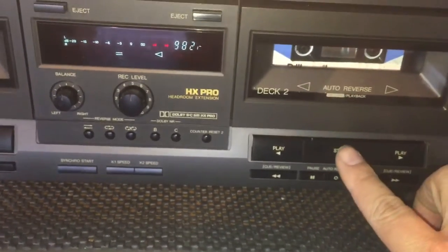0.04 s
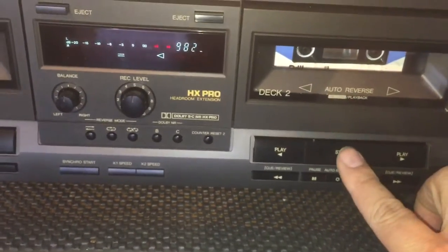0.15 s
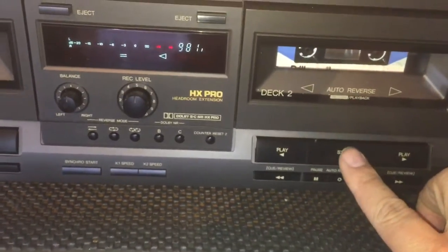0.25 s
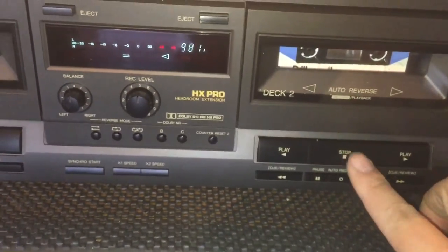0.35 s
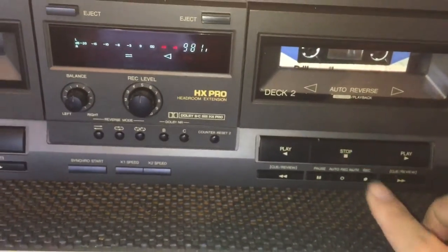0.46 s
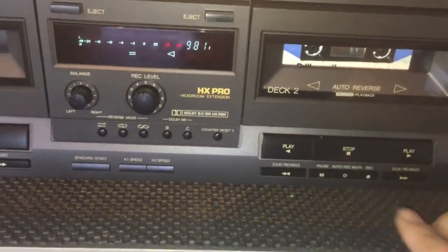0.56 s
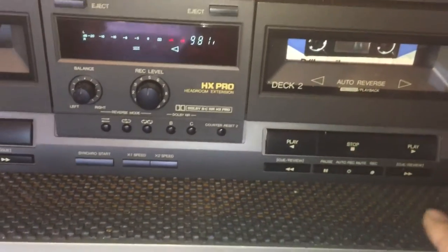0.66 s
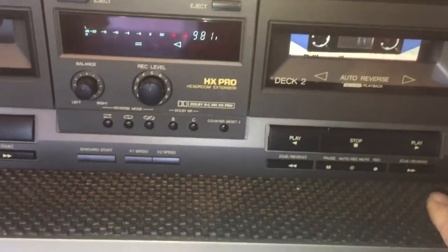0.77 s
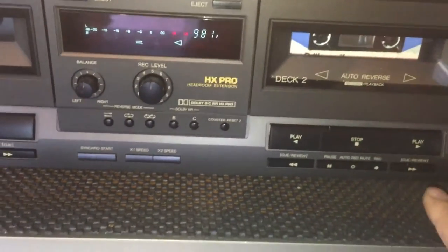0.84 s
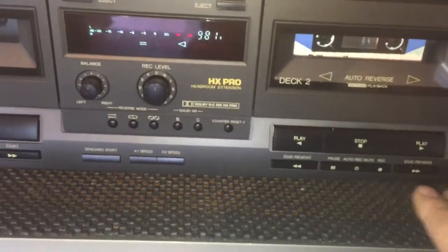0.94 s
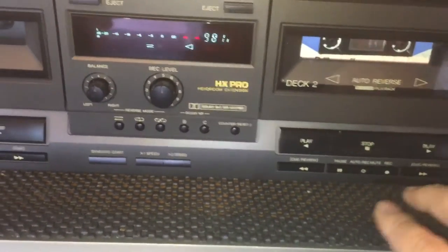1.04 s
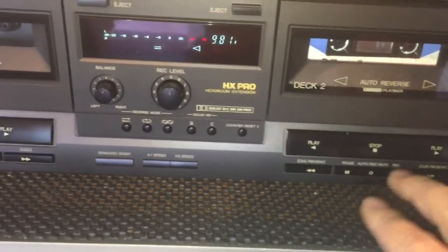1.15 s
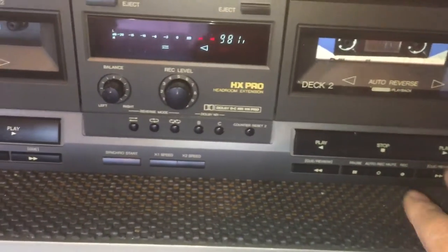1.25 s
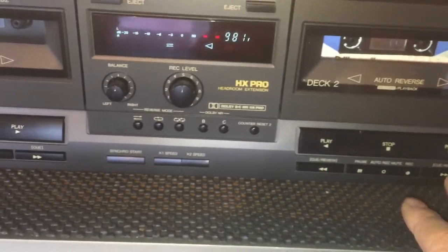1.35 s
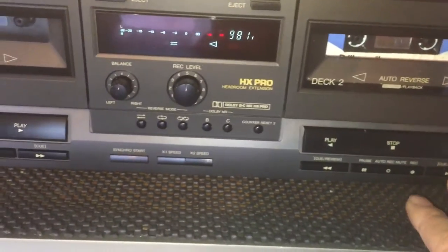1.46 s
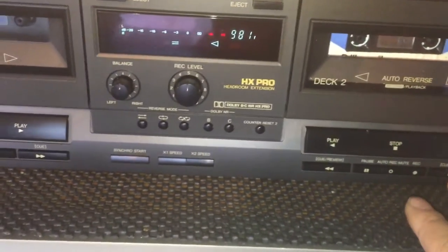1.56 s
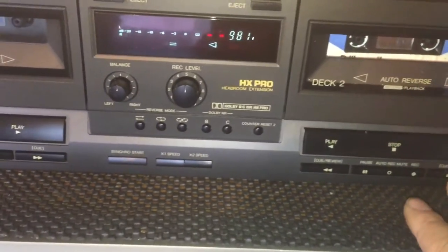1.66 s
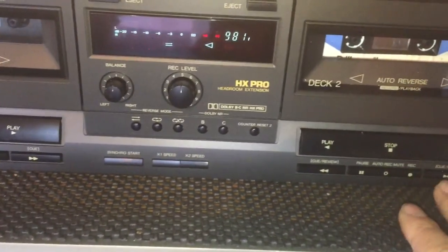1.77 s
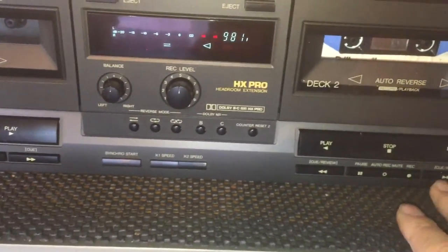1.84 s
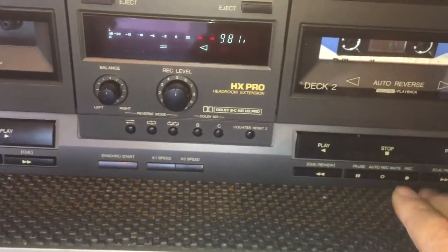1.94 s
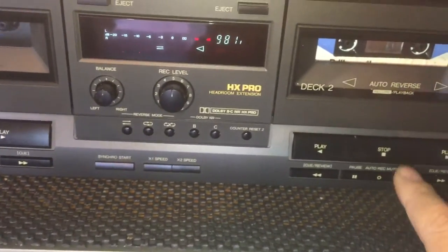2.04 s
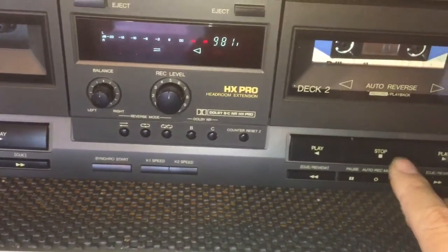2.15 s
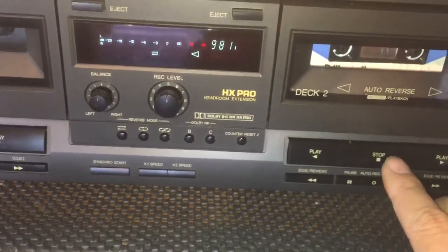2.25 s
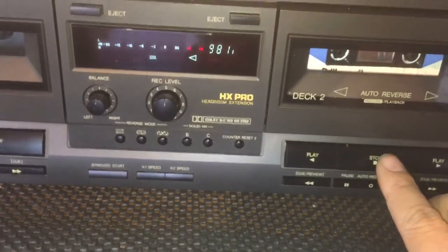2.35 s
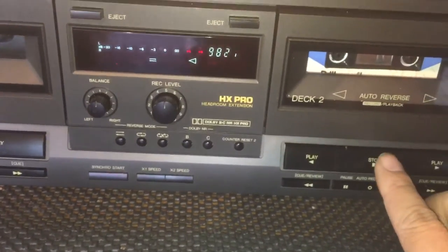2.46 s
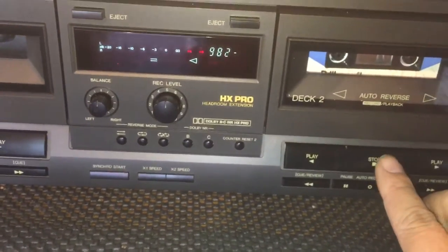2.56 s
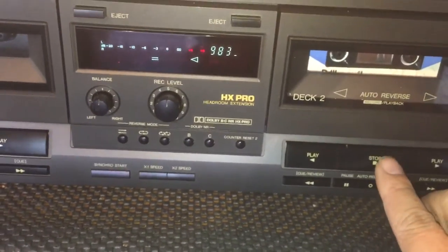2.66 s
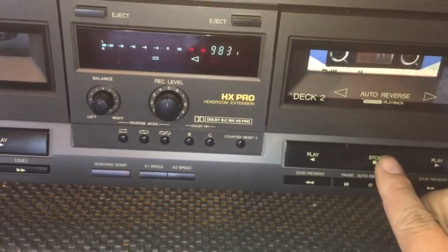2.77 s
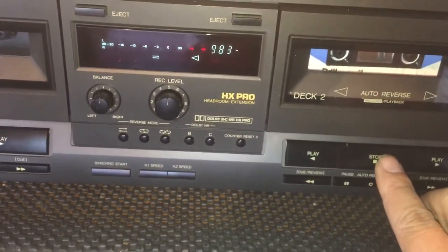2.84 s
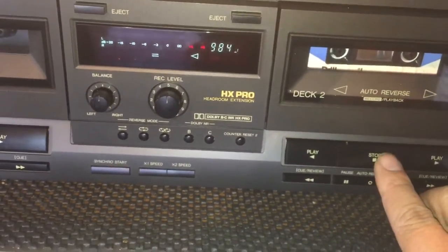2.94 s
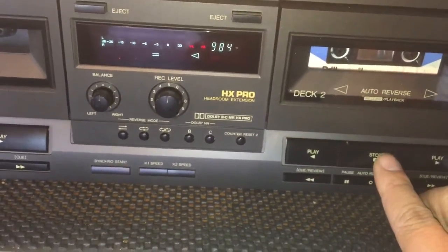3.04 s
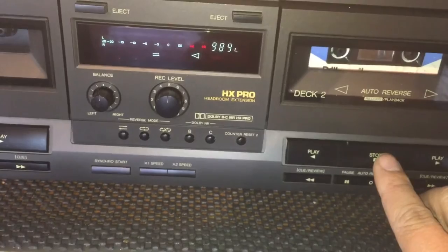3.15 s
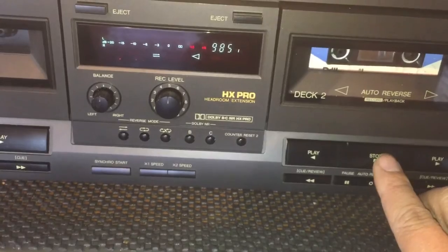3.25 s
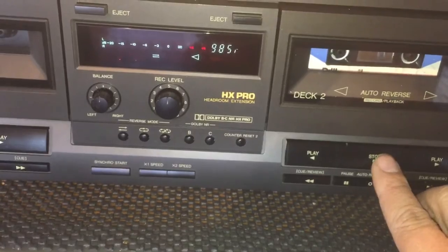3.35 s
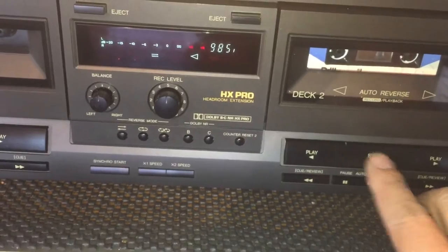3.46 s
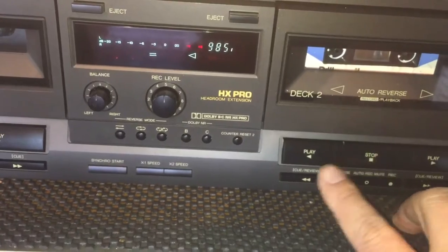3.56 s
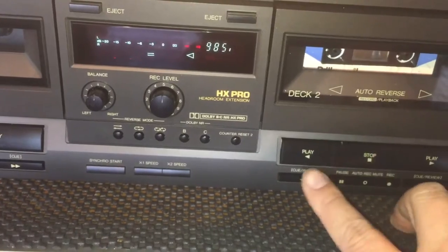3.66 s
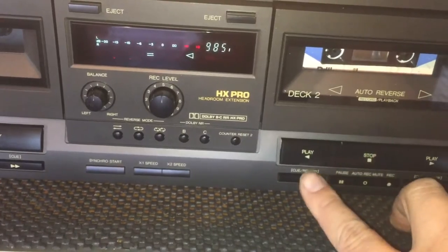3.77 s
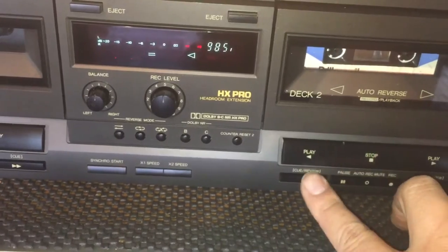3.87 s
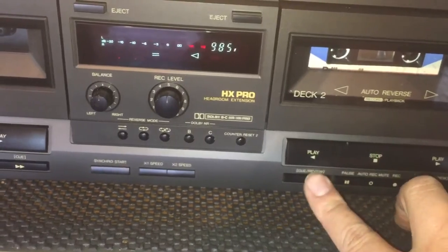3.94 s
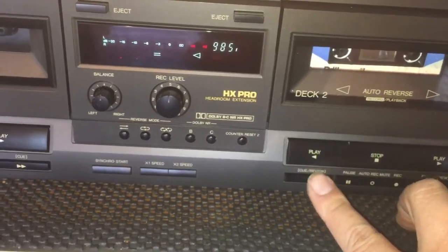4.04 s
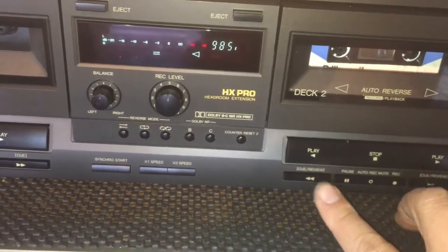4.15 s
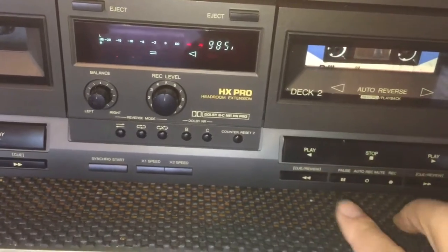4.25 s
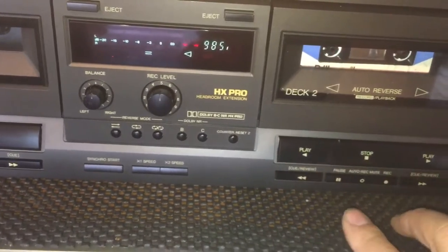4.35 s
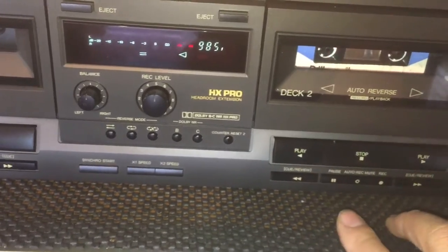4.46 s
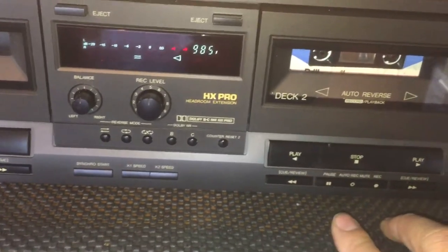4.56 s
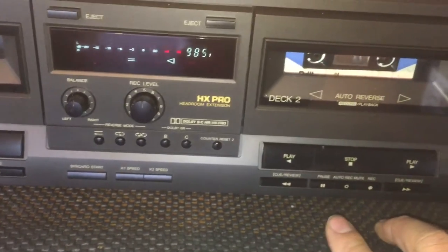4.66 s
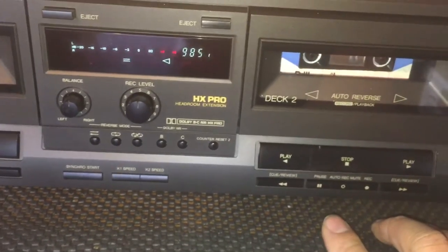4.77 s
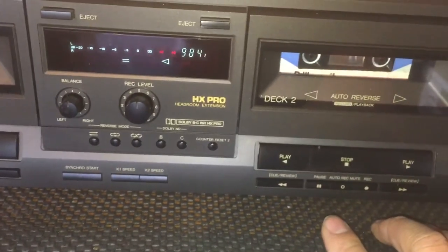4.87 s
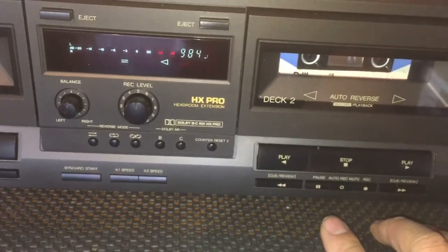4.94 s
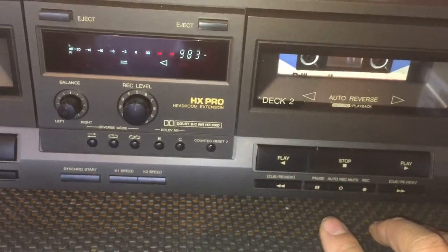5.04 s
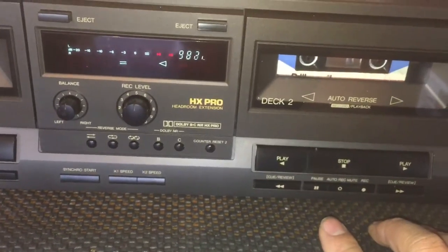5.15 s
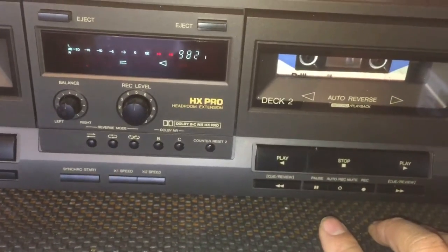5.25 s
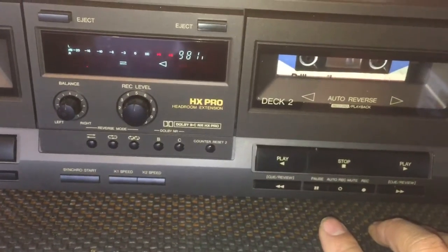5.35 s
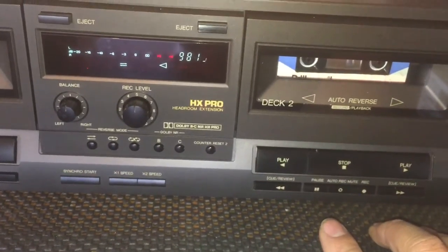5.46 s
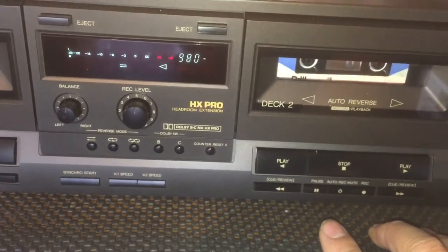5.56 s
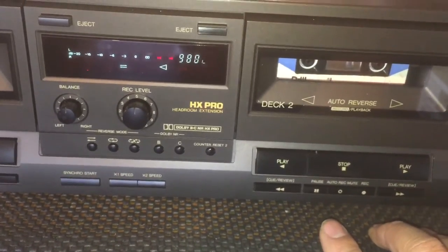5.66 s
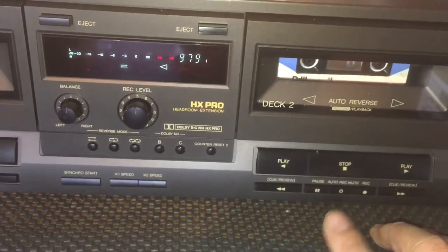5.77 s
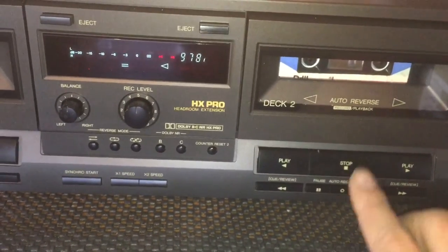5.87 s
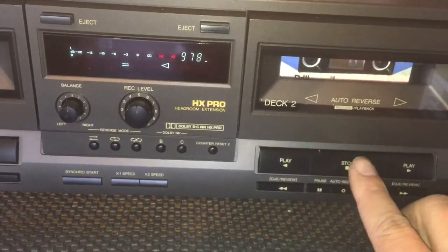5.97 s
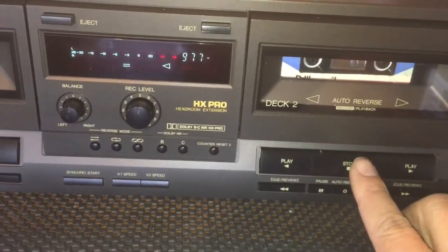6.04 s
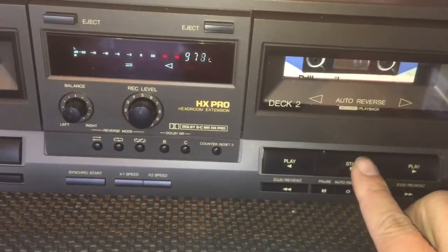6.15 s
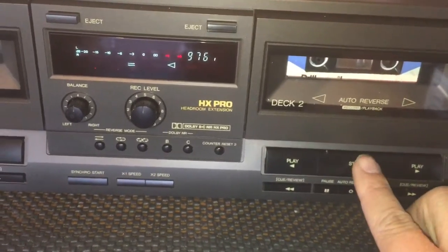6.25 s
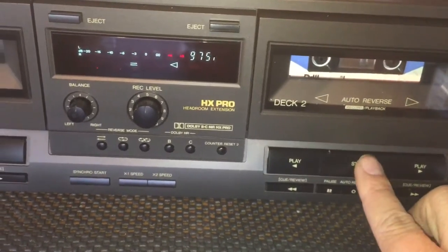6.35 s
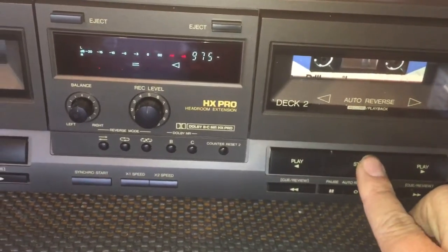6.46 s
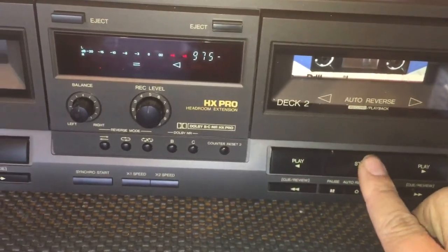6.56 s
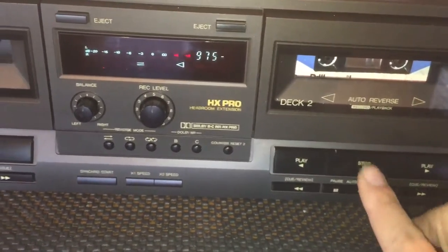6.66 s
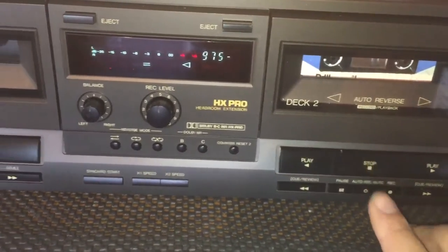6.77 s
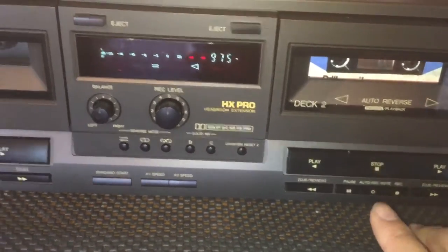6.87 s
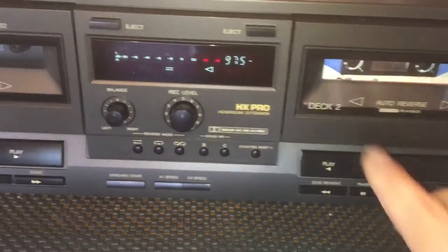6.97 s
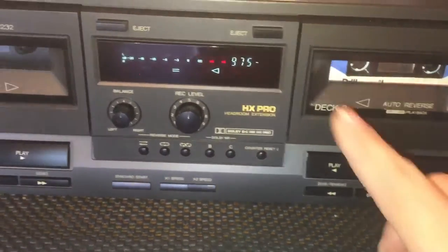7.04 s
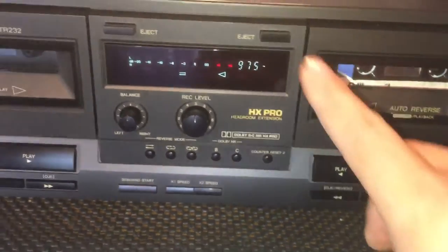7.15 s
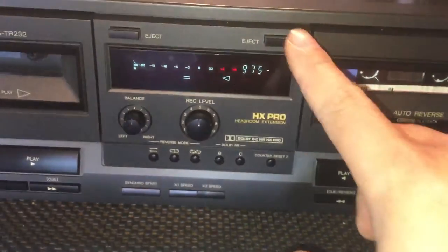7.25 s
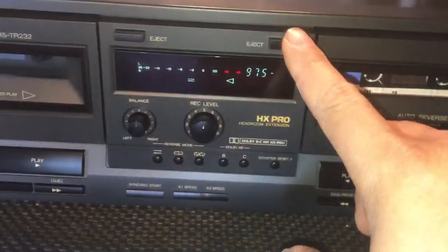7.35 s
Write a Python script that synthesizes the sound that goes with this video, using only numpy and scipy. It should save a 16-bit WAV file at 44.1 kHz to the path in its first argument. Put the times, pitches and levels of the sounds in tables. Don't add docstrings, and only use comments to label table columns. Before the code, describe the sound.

Close in a quiet room, a cassette deck's fast winding ends with a key click and hard brake crack. After a pause, another key sets off a clattering gear change and a short, softly whining slow run, stopped by a second loud clack. A third press brings more clatter, then rapid ticking winding, until a final brake slam. Faint fingernail grazes and a tiny distant squeak finish.

```python
import sys
import numpy as np
from scipy import signal
from scipy.fft import rfft, irfft, next_fast_len
from scipy.io import wavfile
from scipy.ndimage import uniform_filter1d, map_coordinates

SR = 44100
rng = np.random.default_rng(int(sys.argv[2]) if len(sys.argv) > 2 else 0)


def nominal_scale(level):
    x = np.asarray(level, float) / 20
    return 10 ** x


def transcribe(u):
    v = np.clip(np.atleast_2d(u).T, -1, 1)
    q = np.round(v * 32767).astype(np.int16)
    wavfile.write(sys.argv[1], SR, q)


N = 326781

# start in seconds, end in seconds, whine in dB, gear rattle in dB, gear hiss in dB.
FAST = [
    (0, .26, -59, -50.5, -42.5),
    (4.8, 6.48, -57, -52.5, -51.5),
]
SLOW = [
    (1.76, 2.6, -84.5, -60, -64),
    (2.6, 3.45, -54.5, -59, -58),
    (4.16, 4.78, -86.5, -60.5, -61.5),
]
FAST_MESH, SLOW_MESH = 377.4, 384.3
# multiple of the tooth rate, level in dB.
FAST_ORDERS = [(1, -11), (2, 0), (4, -12)]
SLOW_ORDERS = [(1, -13), (2, -3), (3, 0), (4, -1), (5, -16), (6, -12)]
# pitch in Hz, width in Hz, level in dB.
FAST_RATTLE = [(270, 9.7, -2.5), (336, 16, -10.5), (453.4, 63, -15), (870, 80, -7), (980, 99, -6.5),
               (1167, 35, -0.5), (1351, 31, -3), (1470, 43, -2), (1630, 35, -5), (1964, 45, -2),
               (2340, 120, -13), (2760, 76, -8)]
SLOW_RATTLE = [(268, 7, 0), (340.3, 47, -7), (762, 19, -0.5), (1155, 49, 1.5), (1680, 140, -9),
               (2260, 30, -5.5), (2580, 38, -33), (2740, 65, -8)]
# frequency in Hz, level in dB per Hz.
GEAR_HISS = [(1060, -37), (1800, -16), (2280, -7.5), (2480, -9), (2770, -2), (4920, -15.5), (5640, 0.5),
             (6300, -9), (6840, 4.5), (8280, -12.5), (9000, -1.5), (9950, -18.5), (12300, -8),
             (16000, -10.5)]
SLOW_HISS = [(1060, -37.5), (1800, -15), (2740, 2), (5150, -14.5), (5640, -1.5), (6300, -20), (6840, -4.5),
             (9000, -9), (16000, -7.5)]

# time in seconds, level in dB.
RUN_UP_TICKS = [
    (4.762, -27.5),
    (4.784, -27),
    (4.7958, -22),
    (4.8192, -21.5),
    (4.847, -20.5),
    (4.872, -23),
]
# time in seconds, turns counted so far.
TURNS = [
    [(.0142, 0), (.2578, 11)],
    [(4.9164, 0), (5.2278, 14), (5.6938, 35), (6.048, 51), (6.4238, 68), (6.468, 70)],
]
# time in seconds, peak in dB.
SLOW_TICKS = [(2.7116, -39), (2.745, -46), (2.7544, -41), (2.7806, -45), (2.816, -42), (2.8489, -47),
              (2.8664, -52), (2.8848, -43), (2.8954, -43), (2.9198, -43), (2.953, -42.5), (2.9624, -54),
              (2.9944, -61), (3.024, -33.5), (3.0554, -52), (3.0999, -44), (3.1278, -41), (3.1625, -37),
              (3.1974, -47), (3.206, -45), (3.225, -34.5), (3.2405, -42), (3.2714, -48), (3.3016, -33),
              (3.3343, -45), (3.3414, -46.5), (3.3558, -42), (3.3664, -43.5)]
# time in seconds, chatter in dB.
SLACK = [
    (0, 6),
    (4.9, -3),
    (5.2, 16),
    (5.26, -26),
    (5.45, -9),
    (5.92, 5),
    (6.05, -31),
    (6.47, -3),
]
# time in seconds, brightness in dB.
TENSION = [
    (0, -8.5),
    (4.9, -9.5),
    (5.2, -12.5),
    (5.5, -2.5),
    (5.85, -5.5),
    (6.1, -8),
    (6.47, -9),
]
# frequency in Hz, level in dB per Hz.
HUB = [(710, -48.5), (1200, -13.5), (1510, -12.5), (1810, -26), (1950, -11), (2450, -14), (3550, -8.5),
       (4960, -13), (5840, -1), (8080, -8.5), (9010, -1.5), (11200, -4.5), (16000, -10.5)]
# pitch in Hz, width in Hz, level in dB.
HUB_RING = [(3570, 330, -1.5), (4202, 75, 5), (6100, 110, -8), (6440, 310, -2.5), (9100, 200, -5),
            (10400, 100, -6), (11370, 250, 2), (11400, 210, -1.5), (12700, 200, -2), (15550, 250, -7)]
SHELL = [(1180, 90, -11.5), (1500, 200, -11), (2010, 90, -9), (2720, 220, -0.5), (3700, 490, -0.5),
         (5340, 87, 1.5)]

# frequency in Hz, level in dB per Hz.
ROOM_TONE = [(15, -45), (25, -15), (70, 2), (97, -5), (118, -27.5), (192, -26), (226, -30), (470, -35.5),
             (568, -37.5), (617, -38), (902, -35), (1120, -37), (1980, -38), (15200, -50), (16500, -63.5)]
# frequency in Hz, time to fall 60 dB in seconds.
ROOM = [(150, 0.19), (400, 0.62), (750, 0.19), (1500, 0.23), (3000, 0.1), (6000, 0.092), (14000, 0.023)]
# time in seconds, level in dB.
BUMPS = [
    (.66, -71),
    (1.12, -53),
    (3.22, -61),
    (3.91, -58),
    (5.18, -54),
]
# time in seconds, level in dB.
RUB = [
    (1.27, -91),
    (1.33, -70.5),
    (1.5, -68.5),
    (1.57, -80.5),
]
# pitch in Hz, width in Hz, level in dB.
MAT = [(364, 81, -3), (1320, 190, -6), (1690, 310, -12.5)]

# time in seconds, steel peak in dB, plastic in dB, frame in dB.
KEYS = [
    (0.212, -20.5, -3.5, -16),
    (.373, -21.5, -1.5, -10),
    (1.6067, -29.5, -3.5, -7),
    (1.7499, -43, 5.5, -8.5),
    (3.4023, -21.5, -2.5, -13),
    (3.925, -21.5, -2.5, -12.5),
    (4.1575, -40, 5.5, 4.5),
    (6.4446, -14.5, -9, -21.5),
    (6.6517, -22, 0, -9),
]
KEY_SOUND = (2.1,)
# pitch in Hz, width in Hz, level in dB.
KEY_RING = [(2190, 81, -0.5), (3580, 540, -6), (1250, 560, -5.5)]
STOP_DOWN = [(1140, 77, -7), (2250, 82, 1), (2780, 60, -3), (3240, 140, -3), (4310, 73, -13),
             (5110, 94, -19), (5800, 110, -15.5), (7080, 97, -17)]
STOP_UP = [(1170, 110, -3.5), (2220, 110, -7.5), (2750, 68, 2), (4420, 110, -6), (6100, 150, -12),
           (7660, 220, -13.5), (7760, 130, -33)]
FORWARD_KEY = [(872, 110, -15), (1190, 49, -6), (1530, 58, -10.5), (2740, 130, 0), (3060, 110, 3),
               (4170, 130, -6), (5260, 100, -7), (5670, 93, -7.5)]
REWIND_KEY = [(870, 60, -4.5), (1383, 70, -8), (2290, 120, 0.5), (2645, 77, -7), (3280, 100, 0),
              (3550, 100, 3), (5700, 180, -11.5)]
# time in seconds, level in dB.
STOP_DOWN_SNAPS = [
    (.2145, -3.5),
    (3.4038, -2.5),
    (3.4105, -13),
    (6.4448, -1.5),
]
STOP_UP_SNAPS = [
    (.374, -13),
    (6.652, -12),
]
FORWARD_SNAPS = [
    (1.6083, -11.5),
    (1.6115, -29),
]
REWIND_SNAPS = [
    (3.9262, -7.5),
    (3.9289, -11.5),
    (4.158, -27),
]
# time in seconds, level in dB.
PAWL_SNAPS = [
    (.3131, -3),
    (3.5014, -1.5),
    (6.5354, -3),
]
# pitch in Hz, width in Hz, level in dB.
PAWL = [(5800, 900, 0), (7000, 900, -4), (9600, 1800, -2), (12500, 2500, -3)]
# time in seconds, level in dB.
RATCHET = [
    (2.4386, -20),
    (2.4414, -14),
    (2.4447, -15),
    (2.45, -12.5),
    (2.453, -8.5),
]
# time in seconds, peak in dB.
THUDS = [(0.277, -28), (1.78, -43.5), (1.865, -44), (2.224, -38), (2.353, -31.5), (2.567, -33.5),
         (3.406, -44), (3.471, -34), (3.925, -54), (4.17, -43), (4.214, -35), (4.538, -43), (4.607, -41.5),
         (4.67, -31.5), (4.759, -36), (4.891, -30), (6.501, -27.5)]

# time in seconds, steel peak in dB, plastic in
# dB, frame in dB, contact time in ms.
CAM = [(1.8543, -13, -5, -16, 4.35), (1.893, -25, -35.5, -16, 5.4), (1.933, -17, -6.5, -21, 3.9),
       (1.9625, -13, -16.5, -21.5, 3.2), (1.9805, -27, -4, -12, 4.5), (2.0449, -36.5, -2, -11.5, 3.1),
       (2.1196, -29, -12, -11.5, 4.4), (2.1357, -17.5, -19.5, -38, 2.3), (2.219, -19.5, 1.5, -8, 3.5),
       (2.2231, -13, -36, -43, 3.7), (2.3205, -23.5, 2.5, -9, 2.6), (2.331, -22.5, -9, -6, 7.1),
       (2.3411, -11, -12.5, -17.5, 4.3)]
CAM_AGAIN = [(4.1683, -13.5, -6, -16.5, 4.9), (4.2068, -24, -14, -16, 4.9), (4.247, -17.5, -6.5, -20.5, 4),
             (4.2787, -12.5, -14, -21, 2.4), (4.2961, -26, -4.5, -16.5, 4.8), (4.359, -37.5, -2, -8, 3.7),
             (4.4359, -30, -12, -12, 4), (4.451, -16, -16.5, -28, 1.2), (4.5343, -17, 0, -12.5, 2.65),
             (4.5381, -12.5, -15, -20, 3.1), (4.6346, -25, 1.5, -11.5, 3.5), (4.648, -22.5, -5, -12, 5),
             (4.6558, -10.5, -10, -15.5, 3.9)]
BRAKE = [(0.2645, -12, -6, -11, 5), (0.2697, -14, -3.5, -17.5, 4.6), (0.2748, -6, -6, -14.5, 3.2),
         (0.2898, -16.5, -13.5, -19.5, 4.7), (0.3095, -15.5, -15.5, -25.5, 1.4),
         (0.3127, -0.5, -14.5, -27, 2.2), (0.3259, -16.5, -12, -21.5, 2.4), (0.3289, -13, -7, -16.5, 2),
         (3.4511, -20, -8.5, -9.5, 2.7), (3.4549, -10.5, -8, -13.5, 4.6), (3.466, -6.5, -11, -16.5, 4.2),
         (3.487, -26, -2.5, -17.5, 4.1), (3.4986, -17.5, -20, -27, 1.4), (3.5011, 0.5, -16, -27, 1.9),
         (3.5134, -12.5, -9.5, -28.5, 4.4), (3.5176, -16, -5, -13.5, 2.4), (6.4876, -15.5, -9.5, -9, 2.5),
         (6.4895, -13.5, -4, -18.5, 3.6), (6.4974, -4.5, -6.5, -15, 3.6), (6.5125, -17.5, -13, -22.5, 4.1),
         (6.532, -19, -12.5, -20.5, 1.8), (6.5344, 0.5, -20.5, -28, 2.5), (6.544, -14.5, -13, -22, 4.3),
         (6.5517, -14, -7.5, -19.5, 2.9)]
LEVERS = [(1.7793, -53.5, 15, 11, 5.4), (2.2638, -23.5, -5.5, -13, 2.7), (2.2935, -44, 4, -2.5, 3.6),
          (2.367, -15, -11, -26, 4.5), (2.4352, -23, -16, -15.5, 9.8), (2.4493, -17, -17, -24, 5.1),
          (2.4677, -16.5, -8.5, -20, 2.3), (2.4934, -27, -8.5, -11.5, 2.5), (2.5204, -43, -6, -3, 7.1),
          (2.565, -19.5, -1, -6.5, 2.75), (2.599, -28, -10, -16, 2.5), (2.6377, -25, -10.5, -18, 1.5),
          (2.4435, -21, -24, -36, 1.1), (3.4383, -37, -12.5, -15, 2.4), (1.586, -59, 5.5, 4.5, 5),
          (4.5902, -29.5, -4, -10, 2.3), (4.7133, -40, -13, -4, 3.4), (4.7502, -40.5, -7, 0, 4.5),
          (4.756, -35.5, 9, -15, 3.7), (4.7607, -30, -10, -7, 6.1), (4.7794, -16, -7, -19.5, 3.8),
          (4.889, -11.5, -5.5, -11.5, 2.66)]
# time in seconds, steel peak in dB.
GRAZES = [
    (.699, -53),
    (1.5764, -52),
    (6.9626, -52.5),
    (7.0135, -51.5),
    (7.0283, -45.5),
    (7.0458, -52),
]
# plastic in dB, frame in dB, contact time in ms.
GRAZE_SOUND = (-11.5, -20, 1.7)
# frequency in Hz, level in dB per Hz.
STEEL = [(2650, -28), (4500, -14.5), (4920, -7.5), (5900, 0.5), (6560, 5.5), (7070, 0.5), (10600, -2),
         (11900, 6.5), (16000, -8)]
PLASTIC = [(1000, -47), (1700, -5), (1840, -1.5), (2520, 4), (2930, 12), (3380, 6.5), (3700, -2.5),
           (4250, -3), (4800, -11.5), (6240, -41), (10600, -120)]
# pitch in Hz, width in Hz, level in dB.
STEEL_RING = [(6073, 400, 0), (5925, 90, -7.5), (9250, 310, -7), (12200, 1100, -2.5)]
PLASTIC_RING = [(2312, 65, -9.5), (2874, 230, 1.5), (3385, 120, 2), (3550, 170, -9.5)]
CHASSIS = [(511, 61, -6.5), (706, 62, 4), (761, 90, 4), (877, 54, 5), (1011, 93, 0), (1177, 98, 2.5),
           (1365, 45, 0.5), (1594, 47, -1.5), (1640, 20, -8.5), (1664, 100, 1.5)]
CABINET = [(147, 20, -5), (198, 64, -3), (275, 17, 2.5), (319, 17, 0.5), (386, 37, -3)]
COVER = [(890, 5, 2), (1620, 12, -7), (1680, 18, -11)]

# time in seconds, peak in dB, low pitch in Hz, high pitch in Hz, low over high in dB.
PINGS = [(0.275, -3, 1126, 3250, -6), (1.856, -12, 1770, 3060, -13), (1.936, -14, 1500, 3090, -17),
         (1.981, -15, 1615, 3240, -14), (2.223, -8.5, 1093, 2680, -9), (2.322, -13.5, 1104, 3240, -12),
         (2.342, -11.5, 1587, 2020, -3.5), (2.446, -25, 1210, 2310, 4), (2.467, -20.5, 1077, 2800, -1.5),
         (2.567, -21.5, 745, 3080, 1), (3.456, -9.5, 1205, 2450, -9.5), (3.466, -16, 894, 3010, -3.5),
         (4.171, -11, 1140, 3060, -12), (4.25, -24.5, 880, 3250, -15), (4.297, -16.5, 1160, 3240, -12),
         (4.537, -16, 1173, 2790, 0), (4.637, -11, 1080, 3230, -13), (4.657, -18, 870, 2070, -3.5),
         (4.89, -15, 798, 2930, 0), (6.499, -1, 1190, 3205, -7)]
# time in seconds, shelf in dB, long wall in dB, short wall in dB.
SHELF = [
    (.285, -50, -41, -49),
    (2.363, -46, -60, -46),
    (2.569, -54, -53, -36.5),
    (3.471, -43.5, -43.5, -41.5),
    (4.66, -45.5, -65, -52),
    (4.888, -62, -39, -32.5),
    (6.497, -50, -36, -47),
]
# time in seconds, low tone in dB, high tone in dB.
LID = [
    (.28, -56, -62),
    (3.47, -65, -63),
    (6.5, -64, -70),
]
# pitch in Hz, time to fall 60 dB in seconds.
SHELF_MODES = [(158, .61), (266, .3), (336, .22)]
LID_MODES = [(888, 1.1), (1622, .95)]

# time in seconds, pitch in Hz, level in dB.
SQUEAK = [
    (7.115, 1400, -94),
    (7.15, 1390, -74),
    (7.19, 1474, -69.5),
    (7.209, 1650, -77),
    (7.229, 1790, -72),
    (7.34, 1830, -80),
    (7.37, 1830, -102),
]
# frequency in Hz, level in dB.
TOP = [(15700, 0.5), (16000, -15), (16900, -37.5), (17200, -77.5)]


def unit(x):
    return x / np.sqrt(np.mean(x ** 2) + 1e-20)


def along(points, hz):
    f, v = np.transpose(points)
    return np.interp(np.log(hz + 1), np.log(f + 1), v)


def wobble(rate):
    points = rng.standard_normal(int(N * rate / SR) + 4)
    return map_coordinates(points, [np.arange(N) * rate / SR])


def filtered(x, response):
    m = 2 * next_fast_len(N // 2 + SR // 2)
    return irfft(rfft(x, m) * response(np.fft.rfftfreq(m, 1 / SR)), m)[:N]


def body(modes):
    def ring(f):
        total = 0
        for k, (centre, width, db) in enumerate(modes):
            resonance = 1j * f * width / (centre * centre - f * f + 1j * f * width)
            total = total + (-1) ** k * nominal_scale(db) * resonance
        return total
    scale = np.sqrt(np.mean(abs(ring(np.arange(SR // 2))) ** 2))
    return lambda f: ring(f) / scale


def colour(spectrum, modes, ring_db):
    ring = body(modes)

    def response(f):
        cepstrum = irfft(np.log(nominal_scale(np.clip(along(spectrum, f), -70, 20))))
        cepstrum[1:len(f) - 1] *= 2
        cepstrum[len(f):] = 0
        broad = np.exp(rfft(cepstrum))
        return broad / np.sqrt(np.mean(abs(broad) ** 2)) + nominal_scale(ring_db) * ring(f)
    return response


def hiss(spectrum):
    return unit(filtered(rng.standard_normal(N), lambda hz: nominal_scale(along(spectrum, hz))))


def bursts(times, db, ms, force, after_db):
    ms = np.clip(ms, .3, 12)[:, None]
    length = force.shape[1]
    u = np.arange(length) / SR * 1000 / ms
    rise = 1 - np.exp(-14 * u / ms)
    decay = np.exp(-u) + nominal_scale(after_db) * np.exp(-u / 4)
    rows = force * rise * decay * np.cos(np.linspace(0, np.pi / 2, length))
    rows = nominal_scale(db)[:, None] * rows / np.linalg.norm(rows, axis=1, keepdims=True) * np.sqrt(ms)
    at = np.round(np.asarray(times) * SR).astype(int)[:, None] + np.arange(length)
    return np.bincount(at.ravel(), rows.ravel(), N + SR)[:N]


def taps(rows, modes):
    s, db = np.transpose(rows)
    return filtered(np.bincount(np.round(s * SR).astype(int), nominal_scale(db), N), body(modes))


def gates(runs):
    t = np.arange(N) / SR
    gains = sum(nominal_scale(np.array(db))[:, None] * ((t >= start) & (t < end)) for start, end, *db in runs)
    return uniform_filter1d(gains, size=601, axis=1)


def motor(spans, mesh_hz, orders, rattle, teeth, unsteady, waver):
    whine_gain, rattle_gain, hiss_gain = gates(spans)
    phase = 2 * np.pi * mesh_hz * np.arange(N) / SR + waver * wobble(60)
    whine = sum(nominal_scale(db + 10 * unsteady * wobble(22)) * np.sin(k * phase) for k, db in orders)
    frame = unit(filtered(rng.standard_normal(N), body(rattle)))
    shaking = nominal_scale(2.7 * wobble(30)) * frame
    flutter = nominal_scale(8 * unsteady * (wobble(70) + .6 * wobble(300)))
    return whine_gain * unit(whine) + rattle_gain * shaking + hiss_gain * flutter * hiss(teeth)


def knocks(s, db):
    count = len(s)
    same = unit(uniform_filter1d(rng.standard_normal((count, 1024)), size=10, axis=0))
    force = .7 * same + .7 * rng.standard_normal((count, 1024))
    chance = rng.random((count, 6))
    slack_db = np.interp(s, *np.transpose(SLACK))
    knock = bursts(s, db + 11.0, np.full(count, 1.3), force, after_db=-26.0)

    rebound_s = s + 0.0012 + 0.0011 * chance[:, 0]
    rebound_db = db + 9.5 - 3 * chance[:, 1]
    rebound = bursts(rebound_s, rebound_db, np.full(count, 1.7), np.roll(force, 400, axis=1), after_db=-21.5)

    early_s = s + 0.0031 + 0.0094 * chance[:, 2]
    early_db = db + slack_db - 9 * chance[:, 3]
    early = bursts(early_s, early_db, np.full(count, 1.5), force[::-1], after_db=-11.5)

    late_s = s + 0.013 + 0.0098 * chance[:, 4]
    late_db = db + slack_db - 3.5 - 11 * chance[:, 5]
    late = bursts(late_s, late_db, np.full(count, 1.5), force[:, ::-1], after_db=-8.0)
    return knock + rebound + early + late


def hub():
    runs = []
    for run in TURNS:
        s, n = np.transpose(run)
        runs.append(np.interp(np.arange(n[0], n[-1] + 1), n, s))
    beats = np.concatenate(runs)
    beats = beats + rng.normal(0, .0002, len(beats))
    beat_db = -21.5 + rng.normal(0, 1.7, len(beats))
    hard = knocks(*np.concatenate([np.transpose(RUN_UP_TICKS), [beats, beat_db]], 1))
    brightness = nominal_scale(np.interp(np.arange(N) / SR, *np.transpose(TENSION)))
    hard = hard + brightness * filtered(hard, body([(12300, 5000, 0)]))
    small_parts = body([(8000, 11000, 0)])
    light = filtered(knocks(*np.transpose(SLOW_TICKS)), lambda hz: small_parts(hz) ** 2)
    shake_force = rng.standard_normal((len(beats), 1536))
    shake = bursts(beats, beat_db - 6.0, np.full(len(beats), 6.5), shake_force, after_db=-25.0)
    ticks = filtered(hard + nominal_scale(-6.5) * light, colour(HUB, HUB_RING, ring_db=-7.5))
    return ticks + filtered(shake, body(SHELL))


def room(x):
    hz, t, z = signal.stft(rng.standard_normal(SR // 2), SR, nperseg=256)
    tail = signal.istft(z * nominal_scale(-60 * t / along(ROOM, hz)[:, None]), SR, nperseg=256)[1]
    return signal.fftconvolve(np.pad(x, (200, 0)), tail / np.linalg.norm(tail))[:N]


def thumps(rows, t60):
    after = [np.clip(np.arange(N) / SR - row[0], 0, None) for row in rows]
    return sum(nominal_scale(db - 60 * u / t60) * (1 - np.exp(-u / 0.018)) for u, (s, db) in zip(after, rows))


def curves(spans):
    t = np.arange(N) / SR
    gains = []
    for s, *columns in map(np.transpose, spans):
        gains.append([nominal_scale(np.interp(t, s, column, -200, -200)) for column in columns])
    return uniform_filter1d(np.sum(gains, 0), size=301, axis=1)


def quiet():
    traffic = nominal_scale(-68 + .6 * wobble(5.6))
    blows = nominal_scale(-3.5) * thumps(np.array(SHELF)[:, :2], t60=0.5)
    gain = traffic + blows + thumps(BUMPS, t60=0.27)
    rumble = gain * hiss([(25, -35.5), (42, -12.0), (62, -2.5), (90, -5.0), (130, -19.0), (200, -53.0)])
    sliding = unit(filtered(rng.standard_normal(N), body(MAT)))
    rub = curves([RUB])[0] * nominal_scale(3.8 * wobble(39.2)) * sliding
    tone = nominal_scale(-70 + .6 * wobble(17.0)) * hiss([(90, -40.5)] + ROOM_TONE[4:])
    return tone + rumble + rub


def keys():
    s, db, plastic_db, _ = np.transpose(KEYS)
    force = rng.standard_normal((len(s), 1024))
    push = bursts(s + .0007, db + plastic_db + 7, np.full(len(s), 1.5), force, after_db=-21)
    return filtered(push, body(KEY_RING))


def switches():
    caps = [(STOP_DOWN_SNAPS, STOP_DOWN), (STOP_UP_SNAPS, STOP_UP),
            (FORWARD_SNAPS, FORWARD_KEY), (REWIND_SNAPS, REWIND_KEY)]
    domes = sum(taps(rows, np.multiply(cap, [1, 1.7, 1])) for rows, cap in caps)
    spring = taps(RATCHET, [(11700, 3000, 0)])
    return domes + taps(PAWL_SNAPS, PAWL) + spring + nominal_scale(19) * taps(THUDS, CABINET)


def contacts():
    presses = [(*row, *KEY_SOUND) for row in KEYS]
    grazes = [(*row, *GRAZE_SOUND) for row in GRAZES]
    return CAM + CAM_AGAIN + BRAKE + presses + grazes + LEVERS


def clacks():
    s, db, plastic_db, chassis_db, ms = np.transpose(contacts())
    s = s + .0007
    shape = (len(s), 3328)
    force = rng.standard_normal(shape) * nominal_scale(3 * rng.standard_normal(shape))
    frame_db = db + chassis_db

    steel_push = bursts(s, db + 9.5, ms, force, after_db=-17.0)
    steel = filtered(steel_push, colour(STEEL, STEEL_RING, ring_db=-5.0))
    snap_push = bursts(s, db + 13.5 - 4.0 * ms, 0.48 * ms, force[::-1], after_db=-22)
    snap = filtered(snap_push, body([(11800, 1100, 0)]))
    plastic_push = bursts(s, db + plastic_db + 11.0, 1.6 * ms, force, after_db=-22.5)
    plastic = filtered(plastic_push, colour(PLASTIC, PLASTIC_RING, ring_db=-4.5))
    shake = bursts(s, frame_db + 13.5, 1.85 * ms, force, after_db=-12.0)
    frame = filtered(shake, body(CHASSIS))
    cover = filtered(nominal_scale(-24.0) * shake, body(COVER))
    cabinet_db = 0.71 * frame_db - 25 + 2.5 * np.clip(ms - 3, -2, 1.5)
    cabinet = filtered(bursts(s, cabinet_db + 16.5, 5.6 * ms, force, after_db=-12.5), body(CABINET))
    return steel + snap + plastic + frame + cover + cabinet


def pings():
    s, db, low_hz, high_hz, low_db = np.transpose(PINGS)[:, :, None]
    t = np.arange(4096) / SR
    low = nominal_scale(low_db - 60 * t / .04) * np.sin(2 * np.pi * low_hz * t)
    high = nominal_scale(-60 * t / .02) * np.sin(2 * np.pi * high_hz * t)
    rows = (low + high) * nominal_scale(db - 5.5) * (1 - np.exp(-t / .0012))
    at = np.round(s * SR).astype(int) + np.arange(len(t))
    return np.bincount(at.ravel(), rows.ravel(), N) * nominal_scale(2.5 * wobble(200))


def ringing(rows, modes, attack_s):
    out, t = np.zeros(N + SR), np.arange(SR) / SR
    for s, *levels in rows:
        ring = 0
        for db, (hz, t60) in zip(levels, modes):
            ring = ring + nominal_scale(db - 60 * t / t60) * np.sin(2 * np.pi * hz * t)
        out[round(s * SR):][:SR] += ring * (1 - np.exp(-t / attack_s))
    return out[:N]


def shelf():
    lid = ringing(LID, LID_MODES, attack_s=.01) * nominal_scale(5.5 * wobble(40))
    return ringing(SHELF, SHELF_MODES, attack_s=0.0051) * nominal_scale(1.9 * wobble(25)) + lid


def squeak():
    s, hz, db = np.transpose(SQUEAK)
    t = np.arange(N) / SR
    pitch = np.interp(t, s, hz)
    phase = 2 * np.pi * np.cumsum(pitch) / SR + .8 * wobble(150)
    upper_hz = np.minimum(4 * pitch, 5910)
    upper = 2 * np.pi * np.cumsum(upper_hz) / SR + 2.2 * wobble(330)
    opening = np.interp(t, [7.135, 7.155], [-12, 0])
    fading = opening + np.interp(t, [7.21, 7.31], [7, -5])
    slips = nominal_scale(-5 * abs(wobble(70)))
    voices = nominal_scale(opening) * np.sin(2 * phase) + nominal_scale(-10 - 1.7 * opening) * np.sin(3 * phase)
    voices = voices + nominal_scale(-6.5) * np.sin(4 * phase) + nominal_scale(fading) * np.sin(upper)
    return slips * nominal_scale(np.interp(t, s, db, -200, -200)) * voices


def scene():
    fast = motor(FAST, FAST_MESH, FAST_ORDERS, FAST_RATTLE, GEAR_HISS, unsteady=.2, waver=.16)
    slow = motor(SLOW, SLOW_MESH, SLOW_ORDERS, SLOW_RATTLE, SLOW_HISS, unsteady=.36, waver=.36)
    deck = hub() + keys() + switches() + clacks() + pings() + shelf()
    return (deck + fast + slow + nominal_scale(-12.0) * room(deck) + quiet() + room(squeak()))[None]


def band_limit(x):
    return signal.sosfilt(signal.butter(12, 16970, fs=SR, output="sos"), x)


def record(dry):
    rounded = dry[0] / (1 + abs(dry[0] / .82) ** 6) ** (1 / 6)
    mix = filtered(rounded, lambda hz: nominal_scale(along(TOP, hz)))[None]
    return band_limit(mix)


dry = scene()
out = record(dry)
transcribe(out)
```